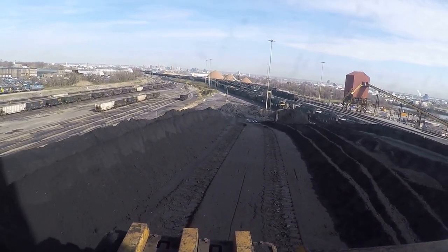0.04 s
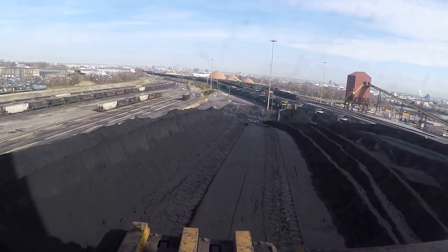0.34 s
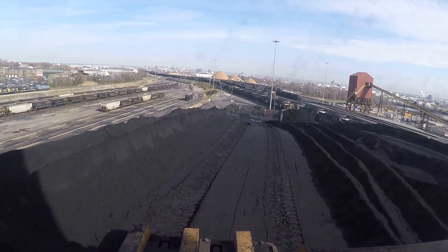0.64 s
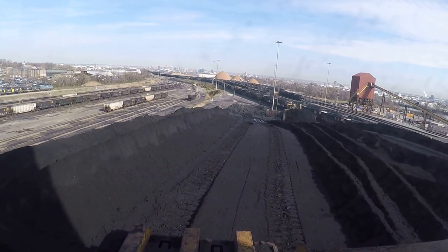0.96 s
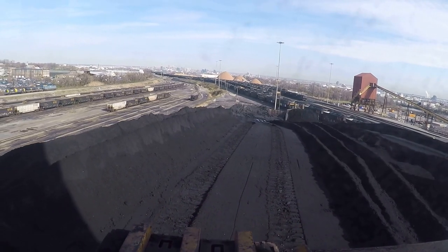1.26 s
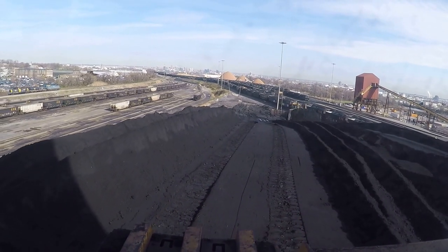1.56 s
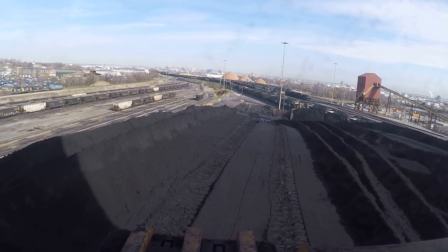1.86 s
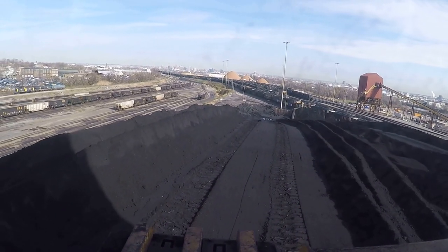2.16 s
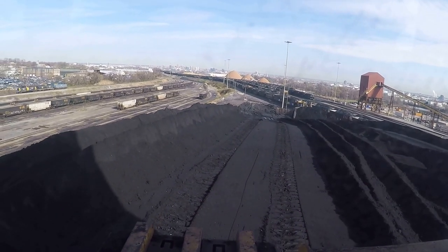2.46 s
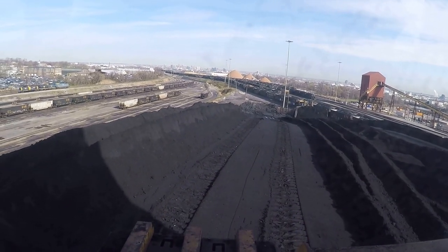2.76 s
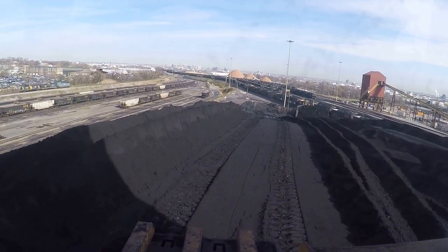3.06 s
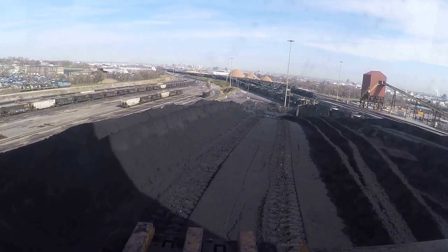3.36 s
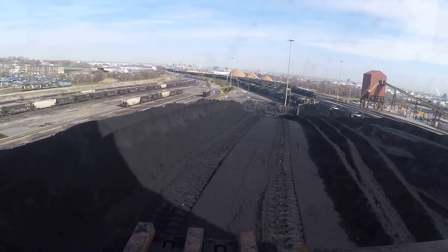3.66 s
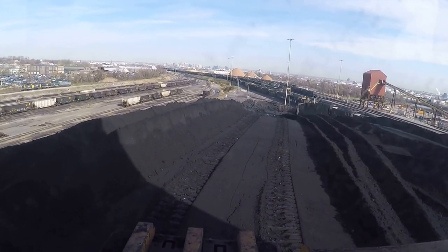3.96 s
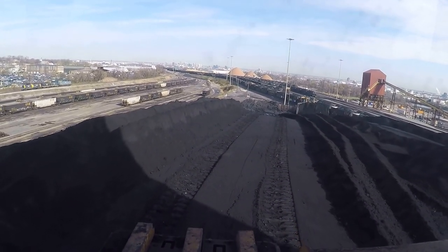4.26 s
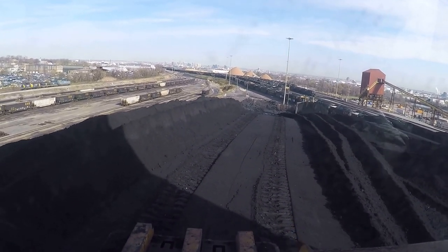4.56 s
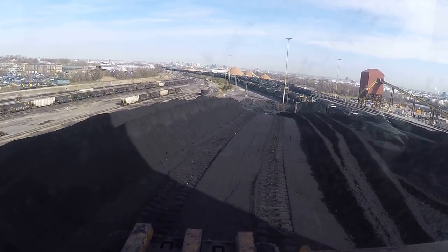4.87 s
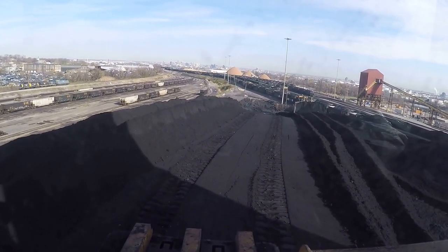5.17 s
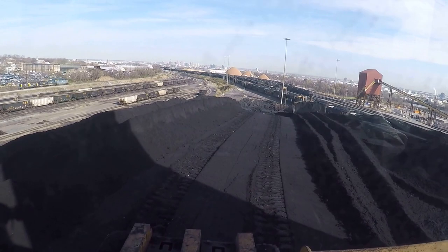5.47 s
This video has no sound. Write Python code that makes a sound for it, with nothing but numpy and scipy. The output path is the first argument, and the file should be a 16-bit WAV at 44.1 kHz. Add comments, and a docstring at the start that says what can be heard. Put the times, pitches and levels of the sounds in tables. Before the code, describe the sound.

A heavy diesel engine throbs and clatters without a break as a bulldozer drives over coal, the microphone inside its cab. Deep booming and rapid dull bumps from the tracks run underneath a wavering gear whine and the sharp, irregular knocking of something loose. A faint high whistle and hiss sit in the background. A few tiny metal scrapes come later, then a faint thin squeal at the close.

```python
"""A six-cylinder diesel drones and rattles, heard from the cab of a big bulldozer crossing a coal pile. The
tracks swing the cab about sixteen times a second: it booms, its panels drum, it bumps its rubber mounts, and a
loose fitting knocks near the top of most swings. Meshing gears whine over the engine, with a faint turbo
whistle and a hiss of cooling air and crushed coal behind them. Twice the fitting rebounds with a gritty rattle;
late on steel scrapes briefly, and squeals thinly at the end."""
import sys
import numpy as np
from scipy import signal
from scipy.fft import rfft, irfft
from scipy.io import wavfile
from scipy.ndimage import uniform_filter1d

SR = 44100
rng = np.random.default_rng(int(sys.argv[2]) if len(sys.argv) > 2 else 0)


def put_to_file(sound):
    """Save the sound as 16-bit audio at rate SR, in the file named by the first command-line argument."""
    columns = np.atleast_2d(sound).T  # one column per channel
    safe = np.clip(columns, -1, 1)
    whole_steps = np.round(safe * 32767)
    wavfile.write(sys.argv[1], SR, whole_steps.astype(np.int16))


N = 243431
TIME = np.arange(N) / SR
FREQS = np.fft.rfftfreq(N, 1 / SR)

# Track shoes landing, rollers jolting over the links, the firing tone's throb: rate_hz, first_peak_s
SHOES, JOLTS, THROB = (3.94, .135), (8.01, .054), (6.33, .046)
# One cylinder fires harder; its surge reaches the cab later at each higher engine order.
SURGE_AT_CYCLES, SURGE_LAG_CYCLES = -.24, .142

# EQ curves that give each layer its colour: frequency_hz, gain_db
HISS_EQ = [(1000, 4.5), (2500, -3.5), (3600, 7.5), (3950, 3), (4500, 1), (4900, -1), (6000, -4),
           (7000, -5.5), (8500, -11.5), (13000, -19), (15500, -27.5)]
SCRAPE_EQ = [(700, -26), (1800, 12), (3500, -4), (4800, -5), (5450, 2), (6100, -15), (7600, -2),
             (8600, -21), (15000, -33)]
THUD_EQ = [(70, -21), (130, 1.5), (200, -0.5), (260, -10.5), (340, -1.5), (450, -6), (650, -3),
           (1200, -28.5), (2000, -49), (5000, -68.5)]
KNOCK_EQ = [(100, -8.5), (400, 5), (800, -6), (1350, 2), (1950, -2.5), (3000, -23.5), (3900, -35.5),
            (5000, -25), (5700, -30.5), (6600, -25.5), (7800, -46), (15000, -61.5)]
PANEL_EQ = [(60, 0.5), (125, 3.5), (150, 7.5), (168, -2.5), (182, 11), (205, 7.5), (222, -5.5), (290, -9),
            (350, -17), (450, -45.5), (600, -21.5), (1500, -70)]
BOOM_EQ = [(15, -13.5), (28, -2), (40, -1), (54, -1), (72, -22), (88, 2), (110, 2), (120, -6), (132, -17),
           (200, -39), (400, -85)]
RATTLE_EQ = [(200, 0), (520, -7.5), (575, -4.5), (630, 6.5), (665, 1), (730, 8), (820, 0), (900, -3.5),
             (965, 0), (1120, 0.5), (1215, -0.5), (1350, -4), (1500, -14.5), (1650, -5.5), (1890, -8.5),
             (2030, -15), (3600, -25), (4200, -42.5)]

# Levels below are set ahead of any trim_db in the layer's function.
# Turbo whistle: time_s, pitch_hz, level_db
TURBO = [(0, 7910, -68), (.4, 7900, -66.5), (.65, 8010, -63), (1, 7867, -65.5), (2, 7780, -68.5),
         (3.55, 7930, -68), (4.4, 7660, -68.5), (4.55, 7440, -69), (5, 7290, -64), (5.35, 7320, -63.5),
         (5.52, 7100, -71)]
# Squeal of rubbing steel: time_s, pitch_hz, level_db
SQUEAL = [(5.15, 4560, -88), (5.21, 4555, -78), (5.33, 4545, -80), (5.42, 4505, -79), (5.46, 4480, -65),
          (5.52, 4470, -66)]
# Short gritty bursts: two quick rebounds of the loose fitting just after its knocks, then a brief scrape of
# steel on steel: start_s, length_s, level_db
GRITTY_BURSTS = [(1.984, .008, -54), (3.88, .009, -47), (4.669, .024, -49), (4.7, .025, -58)]
# Resonances of the cab's thin plates: pitch_hz, width_hz, gain_db
PLATE_MODES = [(567, 4.9, -7.5), (962, 27, 0.5), (1209, 59, 6.5), (1907, 36, -7.5), (3560, 18, -13.5),
               (4450, 160, -25)]
# Ring of those plates: time_s, level_db
PLATE_LEVEL = [(0, -50), (.6, -56), (.85, -45.5), (1.6, -44.5), (1.8, -49.5), (2.4, -45), (3.1, -52.5),
               (4.1, -46.5), (4.8, -55), (5.52, -48)]
# Song of the timing gear: time_s, level_db
GEAR_LEVEL = [(0, -51.5), (2.5, -46.5), (3.5, -48.5), (4.4, -59.5), (5.52, -48.5)]
# Drive train speed: time_s, crankshaft_rpm, whine_hz
SPEED = [(0, 1949, 772.6), (.5, 1928, 765), (.75, 1959.5, 773.3), (2.55, 1956.5, 772), (2.7, 1952, 764),
         (3, 1947, 763.2), (3.5, 1956, 776.7), (4, 1967, 784.3), (4.8, 1991.5, 790.5), (5.52, 1940, 771.5)]
# Transmission whine: time_s, main_mesh_db, lower_mesh_db
WHINE = [(0, -46.5, -56.5), (.45, -43.5, -58), (.75, -47, -53.5), (2, -46.5, -52.5), (2.8, -43.5, -53.5),
         (3.4, -47.5, -57), (3.7, -47.5, -50), (4.5, -43.5, -49), (4.92, -48.5, -51), (5.1, -50.5, -49),
         (5.52, -51.5, -68)]
# Ring of the loose fitting: pitch_hz, gain_db, t60_s
FITTING_MODES = [(1300, -8.5, 0.005), (1930, -22.5, 0.029), (2190, -14.5, 0.016), (2627, -20, 0.017),
                 (2882, -20.5, 0.028), (3320, -24, 0.015), (3637, -30, 0.018), (4560, -40.5, 0.035),
                 (5390, -37.5, 0.024), (6040, -38, 0.018)]
# Knocks of the fitting: start_s, strength_db, brightness_db
KNOCKS = [(0.0458, -27.5, -21), (0.1155, -25.5, -26.5), (0.201, -32.5, -40), (0.3002, -31, -28),
          (0.3738, -25, -33.5), (0.448, -27, -29), (0.6279, -25.5, -24.5), (0.7103, -29.5, -34),
          (0.802, -29.5, -26), (0.8884, -25, -25.5), (0.9725, -30, -31), (1.089, -29, -37),
          (1.1552, -27.5, -22), (1.2265, -26.5, -24.5), (1.407, -26, -26), (1.474, -26.5, -30),
          (1.586, -29, -23), (1.6566, -25.5, -28), (1.7274, -26.5, -29), (1.7996, -29, -32),
          (1.8484, -29.5, -28), (1.9152, -25.5, -25), (1.982, -27, -22), (2.0512, -27.5, -27),
          (2.108, -29, -27), (2.168, -26, -23.5), (2.234, -26, -26.5), (2.2976, -26, -26), (2.36, -29, -26),
          (2.419, -26, -24.5), (2.4836, -25.5, -21.5), (2.5532, -31, -39), (2.608, -29.5, -25),
          (2.6703, -27.5, -23), (2.742, -25, -24), (2.8586, -24, -27), (2.9313, -25.5, -22),
          (3.0085, -29, -24), (3.114, -30, -23), (3.1869, -25.5, -23.5), (3.2608, -31.5, -28),
          (3.383, -32, -31), (3.4445, -29, -27.5), (3.5657, -31.5, -30), (3.6243, -23.5, -25.5),
          (3.6936, -23.5, -25.5), (3.7602, -30.5, -29), (3.8192, -34, -31), (3.8752, -27.5, -22),
          (3.9436, -25, -19.5), (4.0122, -28.5, -28), (4.065, -28.5, -28), (4.1248, -24, -21.5),
          (4.1901, -25, -23.5), (4.254, -28, -27), (4.3146, -29.5, -28), (4.373, -28, -18.5),
          (4.44, -25.5, -26.5), (4.5073, -33, -40), (4.558, -28, -25.5), (4.6227, -26, -24),
          (4.693, -28, -35), (4.87, -31, -38), (5.0527, -31.5, -46), (5.119, -27.5, -36),
          (5.187, -28.5, -37.5), (5.2881, -30.5, -33), (5.353, -26, -36)]
# Drumming of the big panels: time_s, level_db
PANEL_LEVEL = [(0, -31.5), (.6, -34), (1.3, -31.5), (2.7, -33), (3.7, -34.5), (4.7, -34.5), (5.25, -32.5)]
# Cab boom between lumps: time_s, level_db
BOOM_LEVEL = [(0, -38.5), (1, -33.5), (2.2, -34.5), (3.6, -32.5), (4.9, -32.5), (5.52, -31.5)]
# Swells and dips of the boom as the tracks drop over big lumps: centre_s, change_db
LUMPS = [(.48, -13), (.7, 7.5), (.94, 11.5), (1.45, -1), (1.6, 5.5), (2.07, -12), (2.27, -1.5), (2.57, -1),
         (2.73, 14.5), (3.04, 5), (3.92, -0.5), (4.111, 0), (4.59, 1), (5.14, 0), (5.31, 4)]
# Cab swing before its surges: time_s, level_db
SWING_LEVEL = [(0, -16.5), (.3, -23), (.65, -18.5), (.8, -26.5), (1.15, -17.5), (1.4, -21), (1.9, -16.5),
               (2.6, -17.5), (3.2, -19), (4.1, -15.5), (4.65, -18), (4.85, -26), (5.17, -18), (5.52, -27)]
# Engine tones, in multiples of the four-stroke cycle rate (2 is the crankshaft): order, level_db
ORDERS = [(2, -33), (5, -45), (7, -38.5), (9, -35.5), (10, -43.5), (11, -40), (13, -51), (14, -45.5),
          (15, -56), (16, -51.5), (17, -57.5), (18, -62.5), (19, -51.5), (20, -61), (23, -58), (27, -68.5),
          (35, -58.5), (36, -58), (39, -56.5), (44, -55.5), (59, -69), (61, -53), (67, -57), (73, -58.5),
          (74, -62.5), (118, -63.5)]
# How closely each exhaust order follows the load: order, share_db_per_db
LOAD_SHARE = [(7, 0), (9, 1), (14, 1.8), (19, 1.2), (27, 0)]
# Engine drone: time_s, firing_db, octave_db, exhaust_rise_db
DRONE = [(0, -35, -33.5, 1), (.3, -29, -32.5, -0.5), (.55, -35, -29, 0.5), (.8, -33, -40, 1),
         (1.05, -29.5, -36, -0.5), (1.55, -29, -33.5, -0.5), (2, -28.5, -35, 0.5), (2.65, -28, -36, -3),
         (2.95, -31, -35, -1.5), (3.25, -29, -33.5, -0.5), (3.65, -32.5, -38, -2.5), (4.1, -29, -37, -2.5),
         (4.6, -29, -44, 1), (4.8, -43, -43.5, -4.5), (5.05, -42.5, -34, -2.5), (5.35, -30, -35, -5),
         (5.52, -38.5, -35.5, 0)]


def amp(db):
    """Decibels to gain."""
    return 10 ** (np.asarray(db) / 20)


def unit(x):
    """Scales to an rms of one."""
    return x / np.sqrt(np.mean(x ** 2) + 1e-20)


def follow(rows):
    """The columns of an automation table, at every sample."""
    times, *columns = np.transpose(rows)
    return [np.interp(TIME, times, column) for column in columns]


def gain_at(eq, hz):
    """Gain of an EQ curve, its points joined on a log-frequency axis."""
    points_hz, db = np.transpose(eq)
    return amp(np.interp(np.log(hz + 1), np.log(points_hz), db))


def tint(x, eq):
    """Colours x with an EQ curve, at an rms of one."""
    return unit(irfft(rfft(x) * gain_at(eq, FREQS), N))


def drift(hz):
    """A random wander of rms one, rolling off above hz."""
    return unit(irfft(rfft(rng.standard_normal(N)) / (1 + (FREQS / hz) ** 4), N))


def minimum_phase(gain):
    """A filter of this gain that rings only after it is struck."""
    log_gain = np.log(np.concatenate([gain, gain[-2:0:-1]]))
    return gain * np.exp(-1j * signal.hilbert(log_gain).imag[:len(gain)])


def click(eq, size=2048):
    """A click coloured by an EQ curve, peaking at one."""
    pulse = irfft(minimum_phase(gain_at(eq, np.fft.rfftfreq(size, 1 / SR))))
    return pulse / abs(pulse).max()


def add(mix, start_s, sound):
    """Mixes a sound in at start_s."""
    part = mix[max(round(start_s * SR), 0):][:len(sound)]
    part += sound[:len(part)]


def tone(turns):
    """A sine of rms one with a random starting phase."""
    return np.sqrt(2) * np.sin(2 * np.pi * (turns + rng.random()))


def beat(rate_hz, first_peak_s):
    """An even pulse between -1 and 1."""
    return np.cos(2 * np.pi * (TIME - first_peak_s) * rate_hz)


def chug(cycles, order):
    """The hard cylinder's once-a-cycle surge, between -1 and 1, as it arrives near an order."""
    return np.cos(2 * np.pi * (cycles - SURGE_AT_CYCLES - SURGE_LAG_CYCLES * (order - 6)))


def engine_tone(cycles, order):
    """One order at an rms of one, phased to beat against its neighbours with the surge."""
    lag = SURGE_AT_CYCLES * order + SURGE_LAG_CYCLES * (order - 6) ** 2 / 2
    return np.sqrt(2) * np.cos(2 * np.pi * (order * cycles - lag))


def hiss(swing, level_db=-59, depth_db=.4, flutter_db=.95):
    """A bed of cooling air and crushed coal, dulled by the cab glass."""
    air = rng.standard_normal(N) * amp(depth_db * swing + flutter_db * drift(30))
    return amp(level_db) * tint(air, HISS_EQ)


def turbo(trim_db=-4.5, lower_db=-1, waver_db=3, jitter_hz=24):
    """The turbocharger's flickering whistle, with a second line just below it."""
    hz, db = follow(TURBO)
    upper, lower = (
        amp(waver_db * drift(20)) * tone(np.cumsum(hz * ratio + jitter_hz * drift(110)) / SR)
        for ratio in (1, .98))
    return amp(db + trim_db) * unit(upper + amp(lower_db) * lower)


def squeal(jitter_hz=5):
    """Steel rubs on steel and starts to sing."""
    hz, db = follow(SQUEAL)
    gate = TIME > SQUEAL[0][0]
    return amp(db) * gate * tone(np.cumsum(hz + jitter_hz * drift(52.4)) / SR)


def gritty_bursts(grit_db=4):
    """Short gritty bursts: the loose fitting's quick rebounds after two of its knocks, and a brief scrape of
    steel on steel."""
    pressure = np.zeros(N)
    for start_s, length_s, db in GRITTY_BURSTS:
        add(pressure, start_s, amp(db) * signal.windows.tukey(round(length_s * SR), .3))
    return pressure * tint(rng.standard_normal(N) * amp(grit_db * drift(410)), SCRAPE_EQ)


def plates():
    """The engine's vibration keeps a few thin plates ringing."""
    response = sum(amp(db) / (1 + (2 * (FREQS - hz) / width) ** 2) for hz, width, db in PLATE_MODES)
    (level_db,) = follow(PLATE_LEVEL)
    return amp(level_db) * unit(irfft(rfft(rng.standard_normal(N)) * response, N))


def timing_gear(cycles, order=52.15, trim_db=-.8, waver_db=3.1, flutter_db=2):
    """A gear on the engine sings roughly, just above the transmission's main whine."""
    (db,) = follow(GEAR_LEVEL)
    return amp(db + trim_db + waver_db * drift(5.8) + flutter_db * drift(35)) * tone(order * cycles)


def transmission(trim_db=.8, upper_db=-56, waver_db=.9, flutter_db=1.74, jitter_hz=2.1, sway_hz=2):
    """Three gear meshes whine and flutter, their pitch trembling and swaying as each track shoe lands."""
    _, hz = follow(SPEED)
    main_db, lower_db = follow(WHINE)
    turns = np.cumsum(hz + jitter_hz * drift(23.1) + sway_hz * beat(*SHOES)) / SR
    meshes = [(1, main_db + trim_db), (.729, lower_db), (1.25, upper_db)]
    return sum(amp(db + waver_db * drift(3.9) + flutter_db * drift(46)) * tone(ratio * turns)
               for ratio, db in meshes)


def mount_thuds(swing, swing_db, level_db=-27):
    """At the bottom of each swing the cab meets its rubber mounts with a dull bump."""
    bottoms = signal.find_peaks(-swing)[0]
    blows = np.zeros(N)
    blows[bottoms] = amp(swing_db[bottoms] - swing_db.max()) * rng.uniform(.7, 1, len(bottoms))
    return amp(level_db) * signal.oaconvolve(blows, click(THUD_EQ))[:N]


def fitting_knocks(trim_db=3, ring_db=2.5, vary_db=2, detune=.015, lag_s=.001391, neutral_db=-27.5):
    """The loose fitting strikes nearly the same spot each time: a sharp tick and a short ring."""
    out, tick = np.zeros(N), click(KNOCK_EQ)
    t, freqs = np.arange(len(tick)) / SR, np.fft.rfftfreq(len(tick), 1 / SR)
    treble_bell = np.exp(-(np.log((freqs + 1) / 5800) / .59) ** 2)  # centred on 5.8 kHz
    for start_s, strength_db, brightness_db in KNOCKS:
        shift, share = rng.standard_normal((2, len(FITTING_MODES)))
        modes = []
        for k, (hz, db, t60_s) in enumerate(FITTING_MODES):
            decay = amp(db - 60 * t / t60_s)
            modes.append((-1) ** k * decay * np.sin(2 * np.pi * hz * (1 + detune * shift[k]) * t))
        blow = tick + amp(ring_db + vary_db * share) @ np.array(modes)
        edge = minimum_phase(amp(treble_bell * (brightness_db - neutral_db)))
        add(out, start_s + lag_s, amp(strength_db + trim_db) * irfft(rfft(blow) * edge))
    return out


def panels(swing, cycles, boom_db, throb_db=1, jolt_db=1.3, chug_db=.5, boom_share=.69):
    """Big panels drum with the swing, the rollers' jolts and the engine's chug, and swell with the boom."""
    (level_db,) = follow(PANEL_LEVEL)
    pulse_db = throb_db * (2 * swing ** 2 - 1)  # twice a swing
    pulse_db += jolt_db * beat(*JOLTS) + chug_db * chug(cycles, order=12) + boom_share * boom_db
    return amp(level_db) * unit(amp(pulse_db) * tint(rng.standard_normal(N), PANEL_EQ))


def boom_level(lump_s=.04):
    """The boom's level in dB, swelling or dipping briefly at each lump."""
    (rest_db,) = follow(BOOM_LEVEL)
    return rest_db + sum(db * np.exp(-((TIME - s) / lump_s) ** 2) for s, db in LUMPS)


def cab_boom(cycles, boom_db, chug_db=-.5):
    """The tracks make the cab boom, a low rumble that pulses with the engine's chug."""
    rumble = rng.standard_normal(N) * amp(chug_db * chug(cycles, order=6))
    return amp(boom_db) * tint(rumble, BOOM_EQ)


def track_swing(rate_hz=15.8):
    """The cab's swing on the tracks, -1 to 1, with a whole number of swings from knock to knock."""
    knocks_s = np.array(KNOCKS)[:, 0]
    tops_s = np.concatenate([[knocks_s[0] - 1 / rate_hz], knocks_s, [knocks_s[-1] + 10 / rate_hz]])
    swings_per_gap = np.maximum(np.round(np.diff(tops_s, prepend=tops_s[0]) * rate_hz), 1)
    turns = np.interp(TIME, tops_s, np.cumsum(swings_per_gap))
    return np.cos(2 * np.pi * uniform_filter1d(turns, size=7000))


def swing_level(surge_db=4, range_db=7, surge_s=.095):
    """The swing's size in dB: it surges around each knock, more for the harder ones."""
    (steady_db,) = follow(SWING_LEVEL)
    hardest_db = max(db for _, db, _ in KNOCKS)
    surges = [(1.5 + (db - hardest_db) / range_db) * np.exp(-((TIME - s) / surge_s) ** 2)
              for s, db, _ in KNOCKS]
    return steady_db + surge_db * np.max(surges, axis=0)


def cab_pressure(swing, swing_db, trim_db=1):
    """The tracks pump the air in the cab: a sub-bass shudder."""
    return amp(swing_db + trim_db) * swing


def engine_rattle(cycles, swing, level_db=-39, load_db_per_hz=.0014, repeat_share=.21):
    """Combustion and valve gear clatter with the firing, easing off with the load as the turbo slows."""
    # Part of the noise repeats every engine cycle; the rest is fresh.
    one_cycle = irfft(np.exp(2j * np.pi * rng.random(size=1351)))
    looped = np.interp(cycles, np.linspace(0, 1, len(one_cycle), endpoint=False), one_cycle, period=1)
    clatter = np.sqrt(repeat_share) * unit(looped) + np.sqrt(1 - repeat_share) * rng.standard_normal(N)
    firing = tone(6 * cycles) + tone(12 * cycles)
    crankshaft = tone(2 * cycles)
    pulse_db = .9 * firing + crankshaft + .07 * swing + .46 * beat(*SHOES) + drift(43)
    turbo_hz, _ = follow(TURBO)
    load_db = load_db_per_hz * (turbo_hz - turbo_hz.mean())
    return amp(level_db + load_db) * tint(clatter * amp(pulse_db), RATTLE_EQ)


def engine_drone(cycles, waver_db=1.5, throb_db=1.5, jolt_db=2.5):
    """The firing tone throbs, its octave jolts with the rollers, and exhaust orders ride the load."""
    firing_db, octave_db, exhaust_db = follow(DRONE)
    crank = cycles + .0005 * drift(15)  # the crankshaft twists a little, blurring the high orders
    orders = np.zeros(N)
    for order, db in ORDERS:
        wander_db = waver_db * drift(6) * (order > 2)
        load_db = exhaust_db * np.interp(order, *np.transpose(LOAD_SHARE))
        orders += amp(db + wander_db + load_db) * engine_tone(crank, order)
    firing = amp(firing_db + drift(7) + throb_db * beat(*THROB)) * engine_tone(crank, order=6)
    octave = amp(octave_db + .93 * drift(7.8) + jolt_db * beat(*JOLTS)) * engine_tone(crank, order=12)
    return orders + firing + octave


def scene():
    """Engine, drive train and tracks, mixed in mono inside the cab."""
    rpm, _ = follow(SPEED)
    cycles = np.cumsum(rpm + 1.5 * drift(8)) / 120 / SR  # two crankshaft turns to a cycle
    swing, swing_db, boom_db = track_swing(), swing_level(), boom_level()
    engine = engine_drone(cycles) + timing_gear(cycles) + engine_rattle(cycles, swing) + turbo()
    bed = hiss(swing)
    cab = cab_pressure(swing, swing_db) + cab_boom(cycles, boom_db) + panels(swing, cycles, boom_db)
    cab += mount_thuds(swing, swing_db) + plates()
    return (bed + engine + cab + transmission() + gritty_bursts() + squeal() + fitting_knocks())[None]


def record(dry, cutoff_hz=15300):
    """Softens both ends and cuts the very top of the treble."""
    faded = dry * signal.windows.tukey(N, .002)
    lowpass = signal.firwin(511, cutoff_hz, window=("kaiser", 9), fs=SR)
    return signal.oaconvolve(faded, lowpass[None], "same")


dry = scene()
out = record(dry)
put_to_file(out)
```